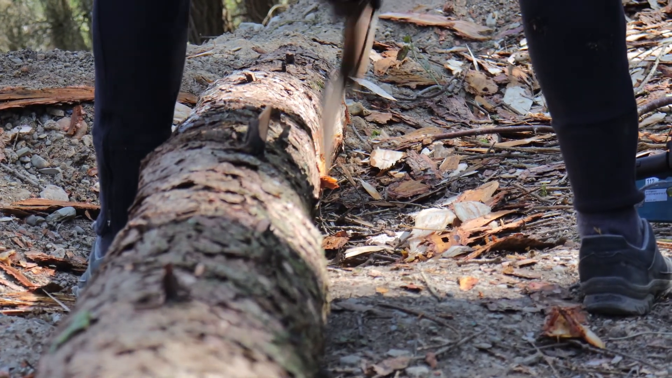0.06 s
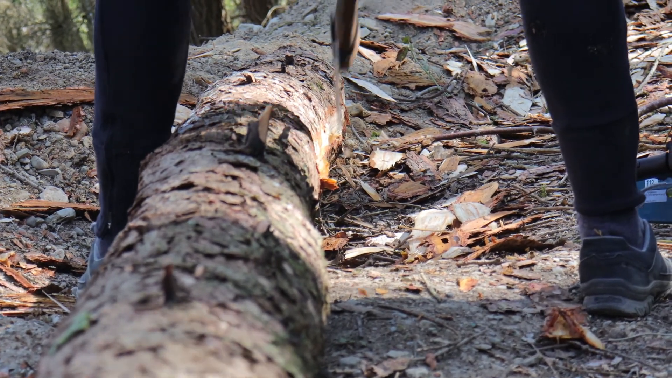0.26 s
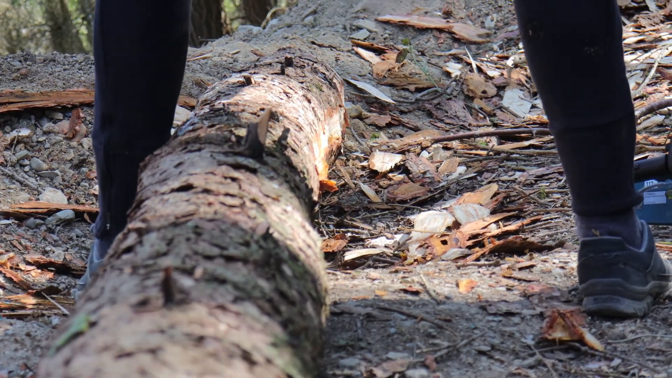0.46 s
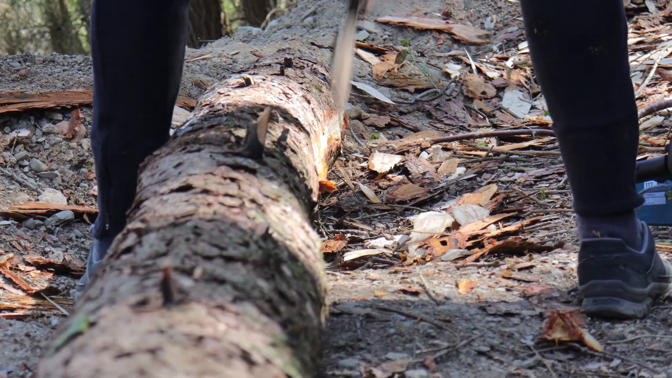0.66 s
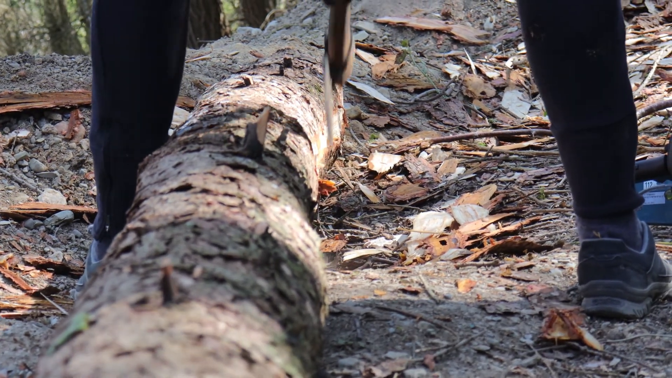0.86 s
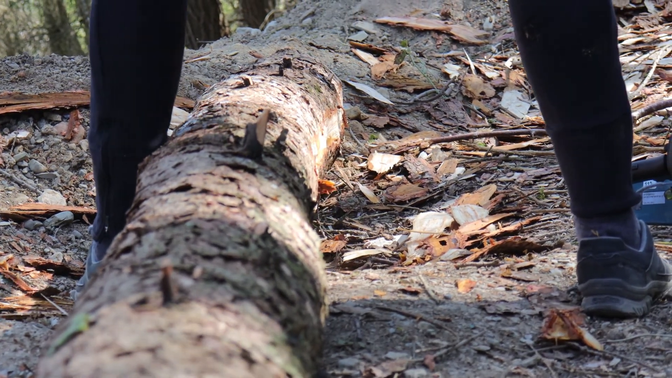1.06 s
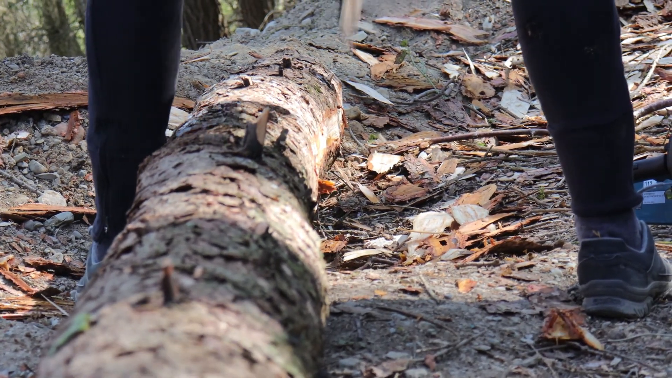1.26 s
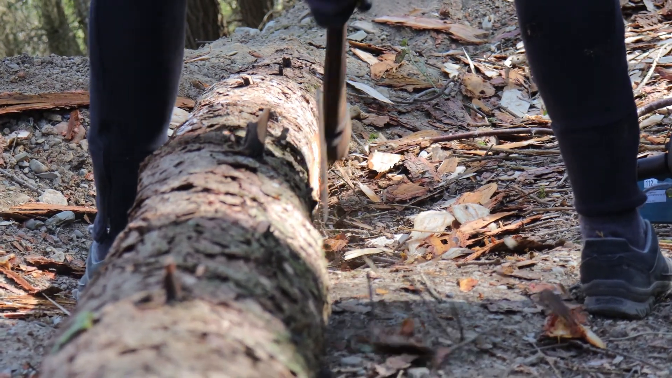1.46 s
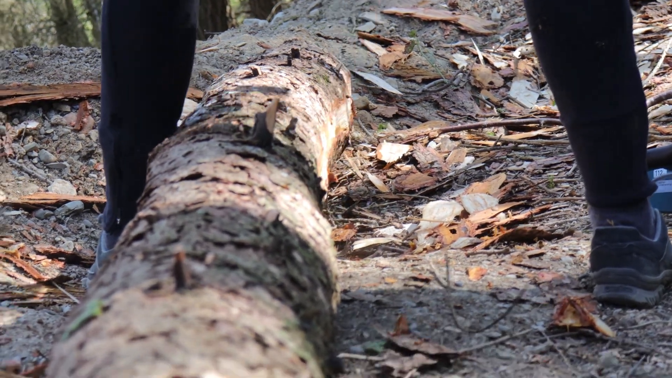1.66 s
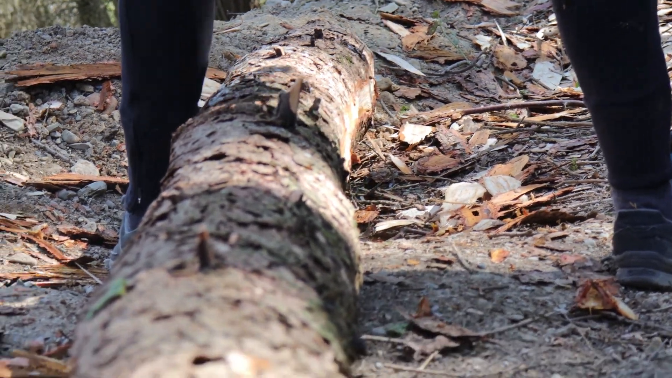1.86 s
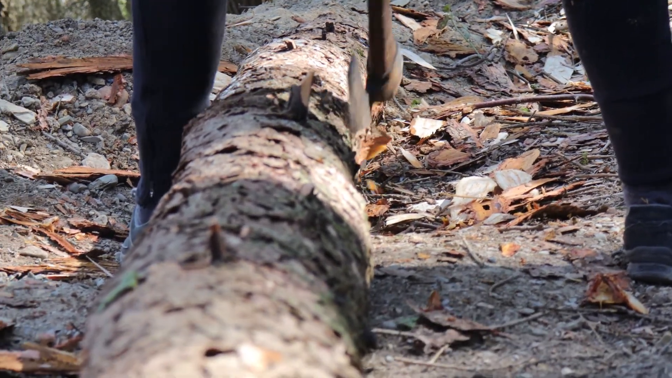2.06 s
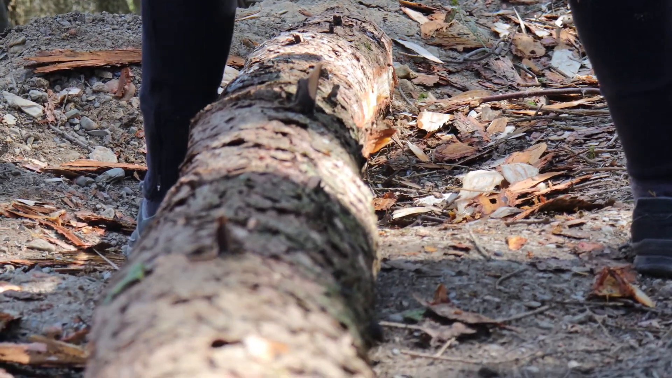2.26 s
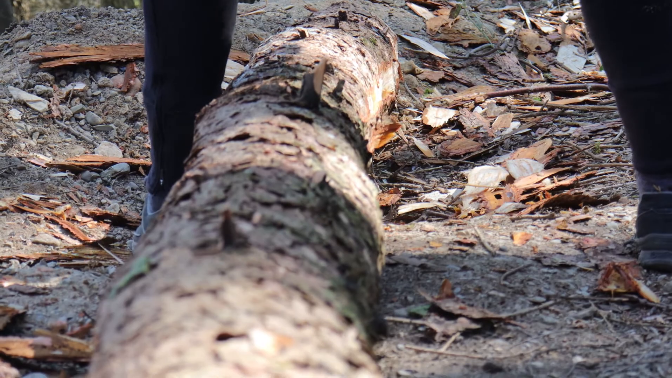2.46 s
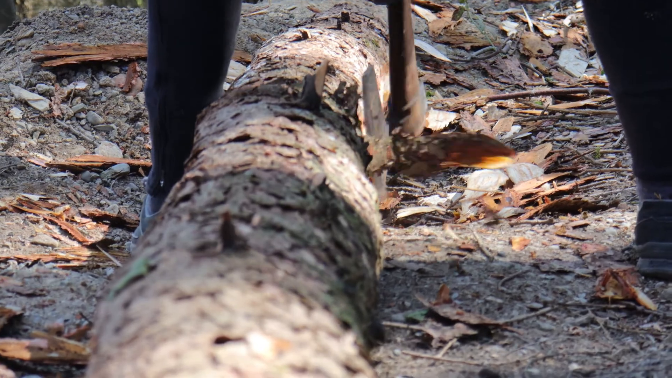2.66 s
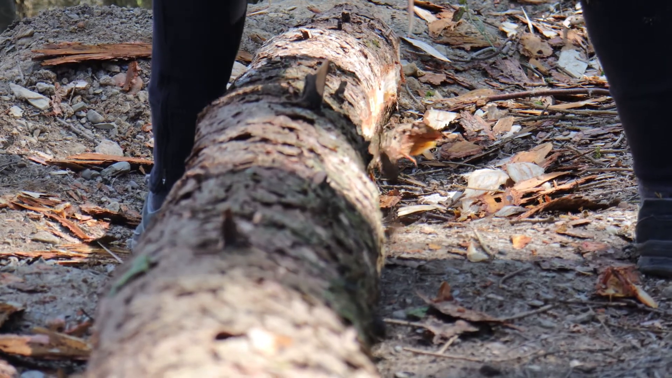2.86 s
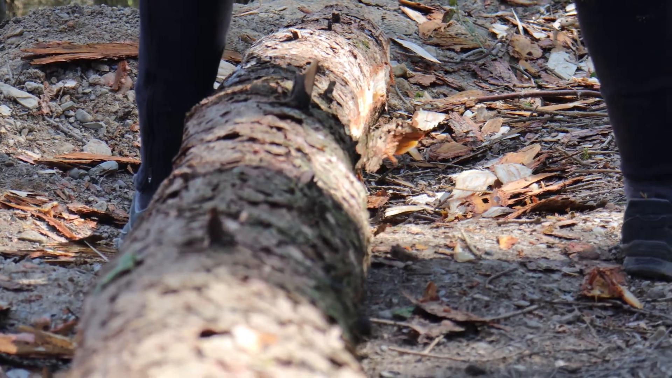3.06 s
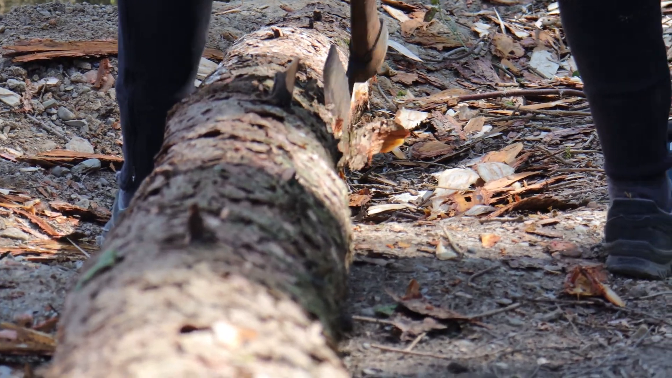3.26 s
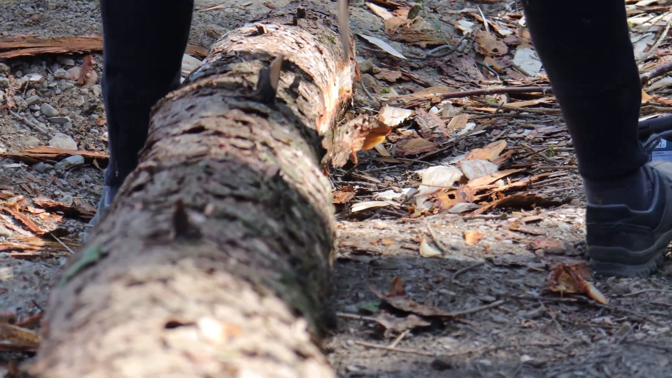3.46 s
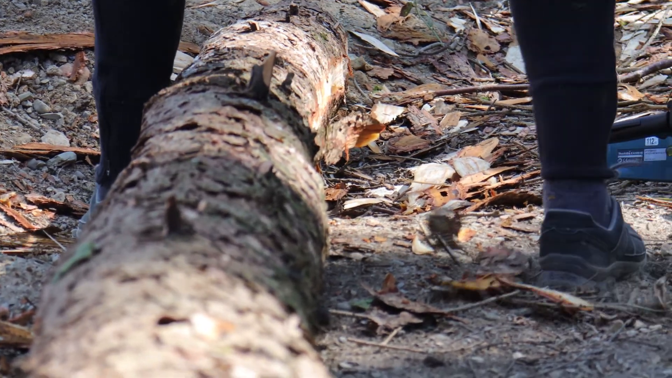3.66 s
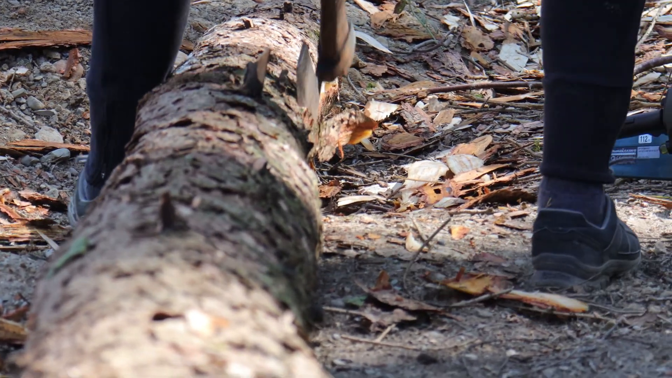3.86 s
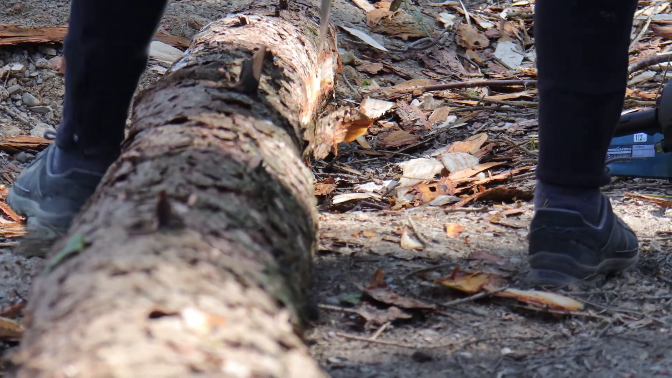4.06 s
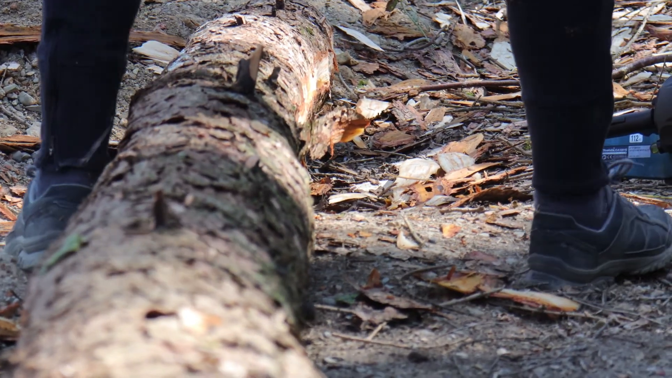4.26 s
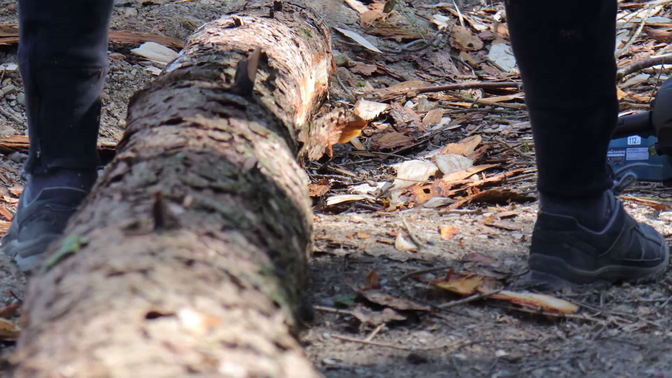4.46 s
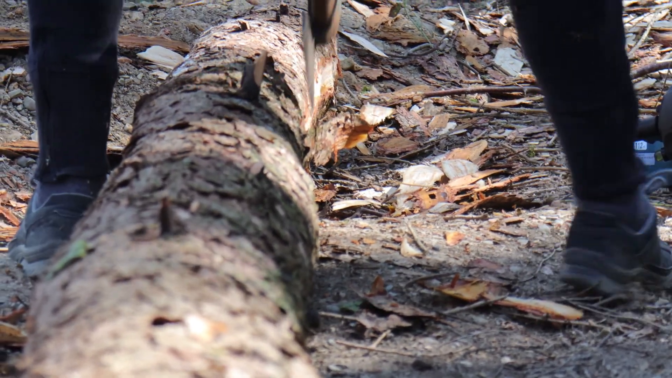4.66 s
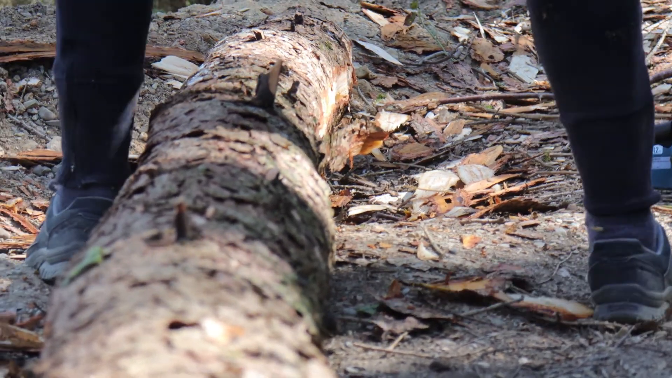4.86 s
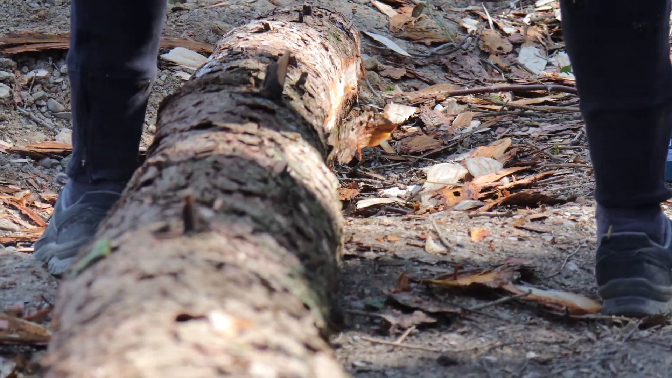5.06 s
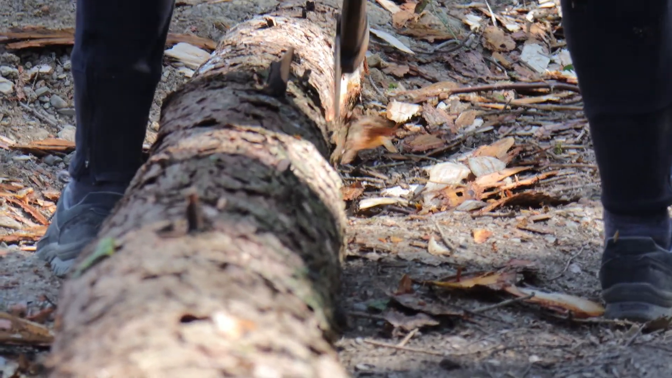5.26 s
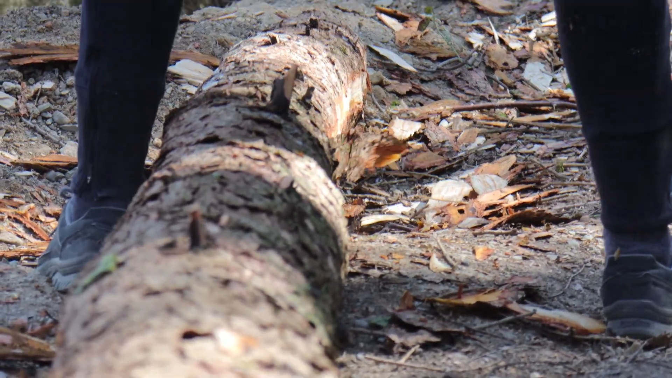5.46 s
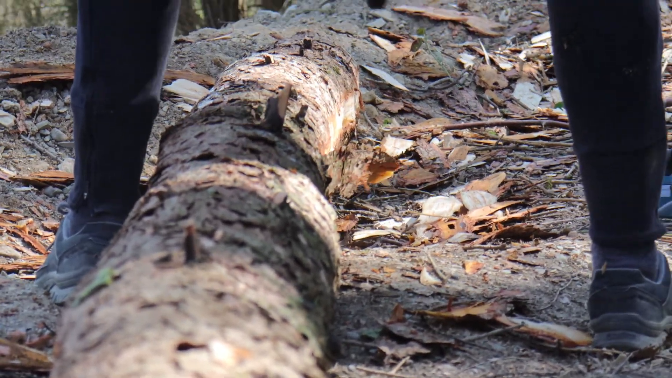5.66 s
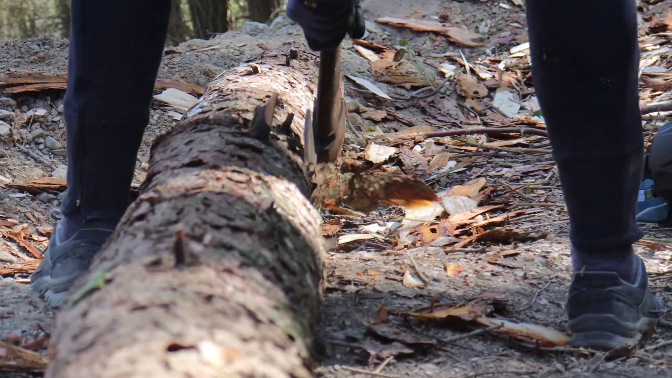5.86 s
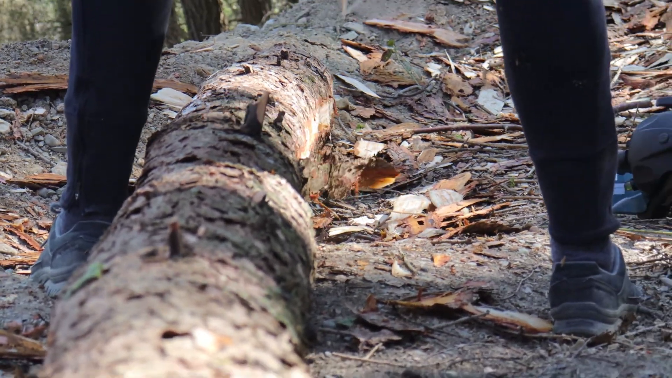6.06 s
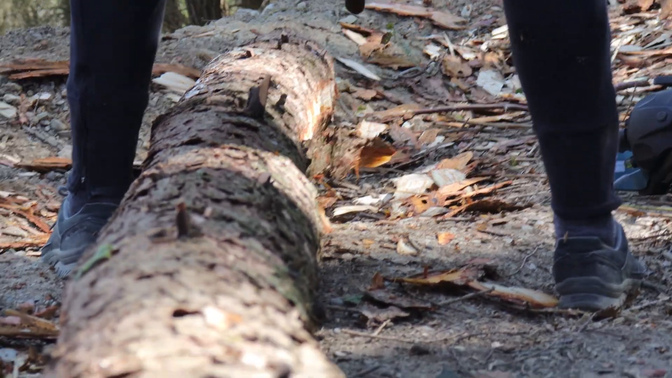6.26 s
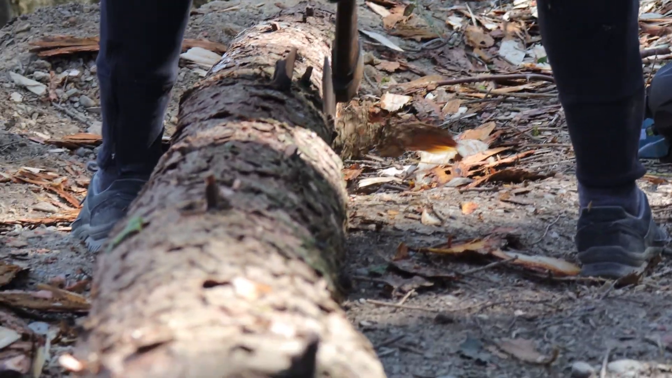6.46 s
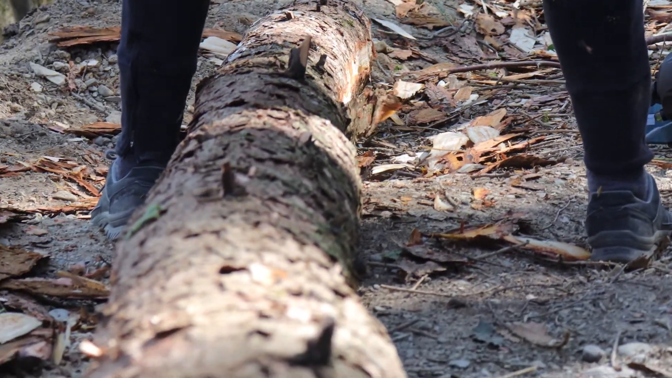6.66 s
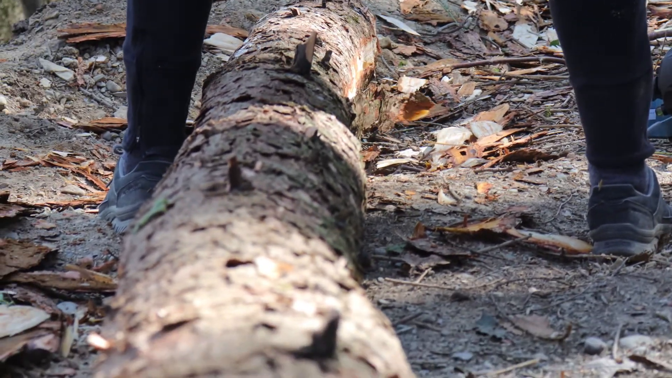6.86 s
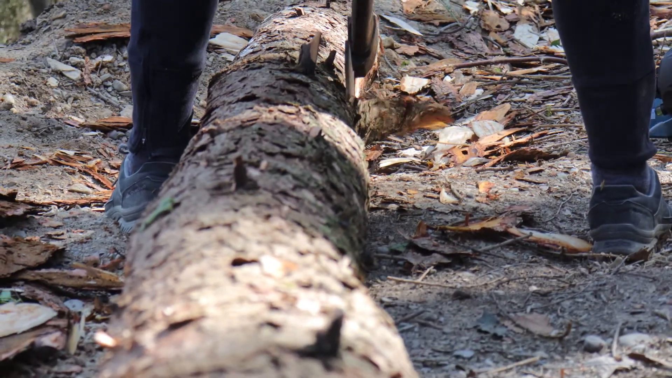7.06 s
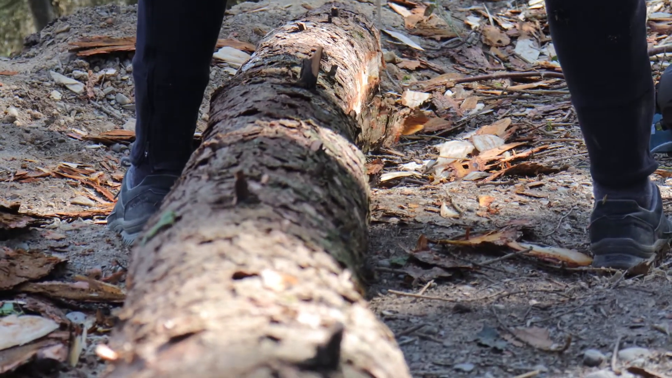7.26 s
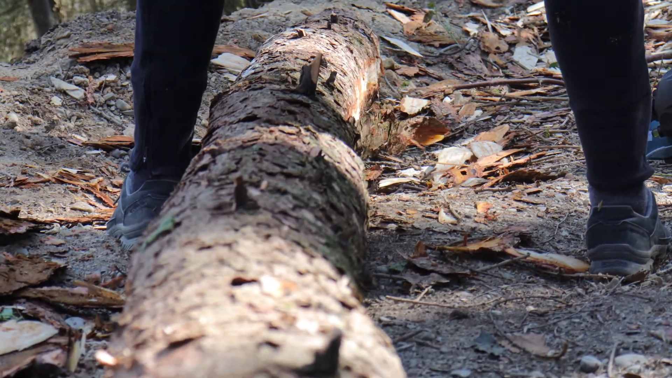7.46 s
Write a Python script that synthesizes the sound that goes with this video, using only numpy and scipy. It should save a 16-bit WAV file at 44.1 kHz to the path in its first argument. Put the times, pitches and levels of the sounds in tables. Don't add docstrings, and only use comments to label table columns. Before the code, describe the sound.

Close, hard axe strokes land in a log about every 0.6 seconds, each a crunchy crack with a short hollow ring of handle and wood and a faint echo off the trees. Chips snap and dry litter rustles between blows; boots and twigs crunch more in the second half. Low hum and leaf hiss lie beneath, with wind thumping a small stereo microphone a couple of metres away.

```python
import sys
import numpy as np
from scipy import signal
from scipy.fft import rfft, irfft
from scipy.io import wavfile
from scipy.ndimage import uniform_filter1d

SR = 44100
rng = np.random.default_rng(int(sys.argv[2]) if len(sys.argv) > 2 else 0)


def int16_out(signal):
    q = np.round(np.clip(np.atleast_2d(signal).T, -1, 1) * 32767)
    wavfile.write(sys.argv[1], SR, q.astype(np.int16))


def convert_level_to_amplitude(level_db):
    exponent = np.asarray(level_db, float) / 20
    return 10 ** exponent


N = 330750
T = np.arange(N) / SR


def on_log(table, count):
    hz, value = np.transpose(table)
    bin_hz = np.arange(count // 2 + 1) * SR / count
    return np.interp(np.log(bin_hz + 1), np.log(hz), value)


def unit(x):
    return x / np.sqrt(np.mean(x ** 2))


def coloured(table):
    white = rng.standard_normal(N)
    return unit(irfft(rfft(white) * convert_level_to_amplitude(on_log(table, N)), N))


def band(x, lo_hz, hi_hz):
    sos = signal.butter(2, [lo_hz, min(hi_hz, 0.45 * SR)], "bandpass", fs=SR, output="sos")
    return signal.sosfilt(sos, x)


def band_noise(shape, centre_hz, width_hz):
    white = rng.standard_normal(shape)
    return unit(band(white, centre_hz - width_hz / 2, centre_hz + width_hz / 2))


def grain(rate_hz, spread_db):
    hold = int(SR / rate_hz)
    steps = np.repeat(rng.standard_normal(N // hold + 1), hold)
    return unit(convert_level_to_amplitude(spread_db * uniform_filter1d(steps, hold)[:N]))


def add(out, start_s, x):
    i = int(start_s * SR)
    out[..., i:i + x.shape[-1]] += x[..., :N - i]


def swell(t, rise_s, t60_s):
    rise = t / max(rise_s, 1e-4)
    fade = -t * np.log(1000) / max(t60_s, 2e-3)
    return np.exp(np.where(t < 0, rise, fade))


def woods():
    # freq_hz, density_db per Hz
    hum_colour = [(18, -38), (30, -6), (58, 0), (76, 0), (112, 4.5), (135, 0), (248, -5.5), (359, -2.5),
                  (492, -10.5), (592, -10.5), (751, -7.5), (2050, -17.5), (6370, -28.5), (14400, -39.5),
                  (16500, -46)]
    # centre_hz, width_hz, level_db
    insect_bands = [(14700, 300, -68), (12400, 900, -69), (13600, 500, -75)]
    # start_s, end_s, pitch_hz, width_hz, level_db
    far_notes = [
        (0.892, 1.22, 2790, 35, -58),
        (1.127, 1.39, 2210, 52, -60),
        (1.92, 2.03, 2800, 50, -63),
        (2.515, 2.62, 3090, 11, -65),
        (2.515, 2.63, 4040, 8, -60),
        (2.51, 2.615, 4590, 9.2, -61.5),
    ]
    shared = coloured(hum_colour)
    hum = np.array([shared + 1.22 * coloured(hum_colour) for _ in range(2)])
    out = convert_level_to_amplitude(-50) * hum * grain(1.71, spread_db=0.53)
    for centre_hz, width_hz, level_db in insect_bands:
        out += convert_level_to_amplitude(level_db) * band_noise((2, N), centre_hz, width_hz)
    for start_s, end_s, pitch_hz, width_hz, level_db in far_notes:
        shape = np.interp(T, [start_s, start_s + 0.014, end_s - 0.04, end_s], [0, 0.98, 0.66, 0])
        out += convert_level_to_amplitude(level_db) * band_noise(N, pitch_hz, width_hz) * shape
    return out


def puffs(table):
    out, t = np.zeros(N), np.arange(-0.02, 0.02, 1 / SR)
    for peak_s, peak_db, centre_hz in table:
        sign, skew, lag, edge = rng.standard_normal(4)
        u = t * np.pi * np.clip(centre_hz, 90, 300)
        swing = (1 - 2 * u ** 2 + skew * u) * np.exp(-u ** 2)
        sharp = (1 - 2 * (2.65 * u) ** 2 + edge * u) * np.exp(-(2.29 * u) ** 2)
        sharp *= convert_level_to_amplitude(0.48 * peak_db - 6.5)
        start_s = peak_s - 0.02
        add(out, start_s, np.sign(sign) * convert_level_to_amplitude(peak_db + 4.5) * (swing + sharp))
        add(out, start_s + 0.01096 * np.sign(lag), convert_level_to_amplitude(peak_db + 2.5) * swing[::-1])
    return out


def wind():
    # peak_s, peak_db, centre_hz
    left_puffs = [(1.051, -22.5, 159), (2.593, -42, 190), (2.611, -27, 170), (2.627, -29, 150),
                  (2.71, -25, 330), (3.118, -34, 278), (3.147, -29.5, 190), (4.145, -41, 210),
                  (4.216, -22, 240), (4.234, -22.5, 190), (4.271, -22, 212), (4.316, -21.5, 200),
                  (4.863, -25, 650), (4.915, -31, 320), (4.929, -30, 160), (4.945, -29, 139),
                  (5.007, -38, 150), (5.173, -23.5, 127), (5.245, -30, 280), (5.268, -34, 260),
                  (5.321, -38, 180), (5.35, -37, 110), (5.414, -44, 110), (5.777, -25, 157),
                  (6.22, -42, 190), (6.246, -38, 200), (6.545, -40, 290), (6.564, -35, 300),
                  (7.478, -31.5, 158)]
    # peak_s, peak_db, centre_hz
    right_puffs = [(0.542, -29, 210), (0.646, -29.5, 220), (0.664, -26, 210), (0.678, -36, 220),
                   (0.699, -20.5, 220), (0.73, -27.5, 190), (0.892, -24.5, 140), (0.918, -43, 180),
                   (0.937, -27.5, 170), (0.952, -35, 150), (0.971, -28, 170), (0.991, -35, 190),
                   (1.007, -21, 160), (1.026, -21, 160), (1.083, -16.5, 160), (1.123, -11.5, 160),
                   (1.147, -9.5, 180), (1.164, -7, 210), (1.198, -11, 210), (1.214, -15, 220),
                   (1.238, -12.5, 200), (1.256, -15, 230), (1.279, -22, 320), (1.305, -30, 240),
                   (1.959, -22, 270), (2.163, -40, 160), (2.3, -37, 150), (2.445, -31.5, 150),
                   (2.521, -37, 130), (2.559, -29, 110), (2.723, -21, 260), (2.757, -18, 240),
                   (2.833, -20, 140), (2.849, -28, 120), (2.88, -19, 140), (2.903, -20, 140),
                   (2.932, -15, 160), (2.947, -15, 180), (2.969, -7, 170), (3.016, -22.5, 210),
                   (3.032, -26, 260), (3.06, -22, 220), (3.077, -21, 310), (3.099, -23, 290),
                   (3.273, -28.5, 220), (3.627, -37, 190), (3.674, -34, 340), (3.69, -20, 210),
                   (3.703, -15, 280), (3.716, -1, 220), (3.766, -34, 160), (3.791, -20.5, 320),
                   (3.81, -21, 330), (3.848, -33, 260), (3.883, -33, 250), (4.158, -39, 200),
                   (4.186, -32, 230), (4.34, -29, 210), (4.352, -25.5, 150), (4.383, -28, 190),
                   (4.434, -34, 170), (4.674, -30, 230), (4.766, -34, 300), (4.779, -31, 710),
                   (4.979, -22.5, 160), (5.022, -30, 610), (5.034, -36, 420), (5.072, -48, 290),
                   (5.085, -31, 120), (5.11, -34.5, 110), (5.127, -35, 150), (5.303, -40, 200),
                   (5.384, -24, 140), (5.44, -26, 160), (5.454, -29, 140), (5.48, -24, 180),
                   (5.55, -34, 140), (5.713, -25.5, 120), (5.758, -36, 210), (5.922, -32, 250),
                   (6.131, -34.5, 270), (6.259, -37, 110), (6.401, -36.5, 130), (6.584, -28, 180),
                   (6.622, -34, 140), (6.641, -39, 160), (6.686, -41, 120), (6.764, -38, 180),
                   (6.776, -31, 180), (6.787, -32.5, 190), (6.804, -33, 160), (6.987, -32, 160),
                   (7.028, -27.5, 140), (7.405, -27, 160), (7.421, -34, 100), (7.459, -24.5, 160),
                   (7.489, -32, 200)]
    left, right = puffs(left_puffs), puffs(right_puffs)
    rumble = [unit(band(rng.standard_normal(N), 70, 187)) * grain(28, spread_db=8.0) for _ in range(2)]
    late_right = np.roll(right, int(0.0019 * SR))
    return np.array([left + convert_level_to_amplitude(-13) * late_right + convert_level_to_amplitude(-67) * rumble[0],
                     right + convert_level_to_amplitude(-12) * left + convert_level_to_amplitude(-55) * rumble[1]])


def litter():
    # time_s, level_db, treble_db above it
    rustles = [
        [(0.2, -40.5, -11), (0.344, -53, -16), (0.5, -69, -6)],
        [(0.82, -34.5, -13), (0.844, -45.5, -12.5), (1.0, -53, -11)],
        [(1.42, -23, -3), (1.496, -41, -3.5), (1.75, -58, -16)],
        [(2.09, -44, 1), (2.188, -51, -16), (2.3, -67, 1)],
        [(2.7, -43, 3), (2.762, -53, -7), (2.85, -47, -8)],
        [(3.33, -37, -8), (3.35, -50, -10), (3.9, -54, -6)],
        [(3.97, -34, -10.5), (4.138, -47.5, -16), (4.45, -48.5, -8.5)],
        [(4.62, -49.5, -11), (4.87, -36, -12), (5.0, -57.5, -5)],
        [(5.22, -30.5, 2), (5.238, -40, -7.5), (5.4, -57.5, -20)],
        [(5.56, -54, -11), (5.656, -60, -10), (5.7, -56.5, -2)],
        [(5.87, -40.5, -6.5), (6.088, -55.5, -28), (6.1, -65, -15)],
        [(6.52, -41.5, -1.5), (6.666, -56.5, -19), (6.7, -70, -8)],
        [(7.14, -39, -4), (7.394, -58, -21), (7.4, -68, 10)],
    ]
    out = np.zeros((2, N))
    shared = rng.standard_normal(N)
    for port in out:
        grit = (shared + 0.5 * rng.standard_normal(N)) * grain(500, spread_db=7.0)
        body, treble = unit(band(grit, 600, 4250)), unit(band(grit, 3140, 14900))
        for rows in rustles:
            time_s, level_db, treble_db = np.transpose(rows)
            first_s, last_s = time_s[0], time_s[-1]
            fade = np.interp(T, [first_s - 0.015, first_s, last_s, last_s + 0.043], [0, 1, 1, 0])
            bright = convert_level_to_amplitude(np.interp(T, time_s, treble_db)) * treble
            port += fade * convert_level_to_amplitude(np.interp(T, time_s, level_db)) * (body + bright)
    return out


def ticks():
    # start_s, peak_db, centre_hz, left_minus_right_db
    snaps = [(1.489, -26, 2220, 2), (1.507, -32.5, 1240, -3), (1.517, -26.5, 2900, 1),
             (1.593, -33, 942, -1.5), (1.605, -36.5, 2200, 4), (1.66, -43, 2200, 0.5),
             (1.689, -33, 3270, -5), (2.25, -39, 2440, -0.5), (2.395, -47, 1010, -1.0),
             (2.479, -44, 834, 4), (2.848, -44.5, 1910, -0.5), (2.88, -43, 816, 3), (2.976, -42, 821, -5.0),
             (3.023, -37, 902, -9), (3.676, -18.5, 816, 3.5), (3.849, -46, 2700, 0.0),
             (4.038, -32, 1880, -0.5), (4.078, -21.5, 1160, 1), (4.244, -31, 980, 5),
             (4.394, -31.5, 1360, 0.0), (4.541, -36, 872, 2), (4.729, -31, 810, -15), (4.745, -25, 950, -9),
             (4.777, -25, 816, -9.0), (4.827, -26, 860, 0.0), (4.879, -28, 926, 5), (4.909, -22, 860, 6),
             (5.022, -23.5, 810, -12), (5.067, -23, 915, -3.5), (5.104, -39, 1130, -0.5),
             (5.122, -31.5, 1680, -4), (5.266, -37, 1760, 3), (5.804, -23.5, 848, 4.5),
             (5.986, -36, 848, -14), (6.132, -43, 867, -10), (6.23, -22, 2000, 9.5), (6.356, -44, 840, 13),
             (6.544, -37, 1490, -3), (6.795, -36, 950, 0.0), (6.982, -40, 1040, 8), (7.303, -41, 2010, -10),
             (7.417, -40, 890, -2)]
    out, t = np.zeros((2, N)), np.arange(0, 0.03, 1 / SR)
    for start_s, peak_db, centre_hz, pan_db in snaps:
        noise = rng.standard_normal(len(t))
        snap = unit(band(noise, 0.44 * centre_hz, 1.53 * centre_hz))
        snap += 0.25 * unit(band(noise, 2100, 11200))
        port_db = np.array([[pan_db], [-pan_db]]) / 2
        add(out, start_s, convert_level_to_amplitude(peak_db - 2.5 + port_db) * snap * swell(t - 0.0008, 0.00025, 0.021))
    return out


def rings():
    # start_s, handle_db, log_db, knock_db, upper_handle_db, steel_db
    blows = [(.169, -11.5, -19, -24.5, -41, -40), (0.779, -26, -15, -27.5, -35, -35),
             (1.397, -22, -21, -36, -26.5, -19.5), (2.067, -26.5, -35, -34, -32.5, -37),
             (2.670, -12.5, -16, -23.5, -31, -32.5), (3.301, -19, -22.5, -26, -34.5, -44),
             (3.939, -21.5, -24.5, -32, -32.5, -39), (4.586, -11.5, -20, -34, -34, -37),
             (5.192, -19.5, -34.5, -24.5, -27, -31.5), (5.836, -14, -31, -26, -21.5, -44),
             (6.486, -12.5, -21, -20, -32, -37), (7.107, -16.5, -26.5, -20.5, -31, -44)]
    # pitch_hz, level_db, t60_s
    handle = [(303, 2.5, 0.28), (297, -14.5, 0.24), (198, -12, 0.19)]
    log = [(431.5, 0, 0.19), (457, -2, 0.17), (397.5, 3, 0.11)]
    knock = [(562.5, 6.5, 0.099), (692, 6, 0.077), (1271, 8, 0.047), (240, 6, 0.073)]
    upper_handle = [(828, 8, 0.1), (930, -10.5, 0.055)]
    steel = [(2440, -5.5, 0.31), (2510, 7, 0.11), (3230, -4, 0.19), (4450, -9.5, .25), (5550, -4, .2),
             (1915, 4, 0.088)]
    parts = (handle, log, knock, upper_handle, steel)
    out, t = np.zeros(N), np.arange(0, 0.5, 1 / SR)
    for start_s, *part_levels_db in blows:
        for part_db, modes in zip(part_levels_db, parts):
            for pitch_hz, mode_db, t60_s in modes:
                tune, weight, phase = rng.standard_normal(3)
                push = 1 - np.exp(-t * pitch_hz * 1.97)
                tone = np.sin(2 * np.pi * pitch_hz * (1 + 0.0046 * tune) * t + phase)
                level = convert_level_to_amplitude(part_db + mode_db + 0.7 * weight)
                add(out, start_s, level * push * tone * swell(t, 1, t60_s))
    return out


def cracks():
    # start_s, peak_db, thud_db and splinter_db above it, rise_s, t60_s
    splits = [(0.1635, -0.5, -6, -9, 0.0013, 0.028), (0.7768, -3, -13, -7.5, 0.0018, 0.037),
              (1.3942, -1, -8, -3.5, 0.0019, 0.044), (1.41, -9.5, -17, -16, 0.0029, 0.046),
              (2.0345, -3, -8, -4, 0.0023, 0.058), (2.0636, -2.5, -5.5, -5, 0.0027, 0.017),
              (2.6505, -8.5, -0.5, -8, 0.0013, 0.042), (2.6682, -9, -6.5, -1.5, 0.0029, 0.069),
              (3.2996, -0.5, -3.5, -5.5, 0.002, 0.019), (3.935, 2.5, -6.5, -6.5, 0.0013, 0.028),
              (4.5822, 2.5, -2.5, -6.5, 0.0012, 0.023), (5.1893, -1, -3, -5.5, 0.0019, 0.044),
              (5.201, -14.5, -16, -11, 0.0026, 0.052), (5.833, 0, 1, -7.5, 0.0018, 0.028),
              (6.4819, 1, -6, -6.5, 0.002, 0.033), (7.0944, 0, 0.5, -3, 0.0012, 0.028),
              (7.1059, -2.5, -18, -4, 0.0042, 0.028)]
    # freq_hz, density_db per Hz
    wood_colour = [(240, -28), (400, -2), (844, -1), (1050, 1), (1260, -2), (2150, -9), (2510, -3.5),
                   (2930, -13), (3700, -9), (4190, -13.5), (5460, -7), (7220, -5.5), (7920, -8.5),
                   (15200, -18.5), (16500, -39)]
    wood = coloured(wood_colour) * grain(900, spread_db=2.0)
    thud, snap, splinter = unit(band(wood, 470, 1526)), unit(band(wood, 1310, 4830)), unit(band(wood, 5500, 18700))
    out, t = np.zeros(N), np.arange(-0.03, 0.3, 1 / SR)
    for start_s, peak_db, thud_db, splinter_db, rise_s, t60_s in splits:
        first = int((start_s - 0.03) * SR)
        now = slice(first, first + len(t))
        burst = convert_level_to_amplitude(thud_db) * thud[now] * swell(t - 0.0015, 1.58 * rise_s, 1.2 * t60_s)
        burst += snap[now] * swell(t - 0.0021, rise_s, t60_s)
        burst += convert_level_to_amplitude(splinter_db) * splinter[now] * swell(t - 0.0019, 0.41 * rise_s, 0.97 * t60_s)
        out[now] += convert_level_to_amplitude(peak_db - 5) * burst
    return out


def trunks(x):
    t = np.arange(0, 0.6, 1 / SR)
    tail = band(rng.standard_normal((2, len(t))), 310, 6400) * swell(t - 0.028, 0.0064, 0.39)
    return signal.fftconvolve(x[None], tail, axes=1)[:, :N]


def ports(x):
    # freq_hz, left_minus_right_db
    port_db = [(60, -0.5), (110, -0.5), (200, 2), (380, -1.5), (700, 1), (1290, 1.5), (2380, -4),
               (4400, -0.5), (8120, 0.5), (15000, -9)]
    # freq_hz, left_lead_rad
    port_phase = [(0, 0), (2410, -0.23), (3010, 0.66), (4050, 0.82), (4650, -0.77), (7060, -0.68),
                  (7840, -0.78), (10200, -1.2), (10500, -1.2), (12400, 0.17), (14300, 2), (15300, 1.1),
                  (15800, 0.29), (16200, 0.1)]
    half = convert_level_to_amplitude(on_log(port_db, N) / 2) * np.exp(0.5j * on_log(port_phase, N))
    return irfft(rfft(x) * np.array([half, 1 / half]), N)


def scene():
    axe = cracks() + rings()
    return ports(axe) + convert_level_to_amplitude(-57.5) * trunks(axe) + ticks() + litter() + wind() + woods()


def roll_off(x):
    return signal.sosfilt(signal.butter(12, 16610, fs=SR, output="sos"), x)


def record(dry):
    bass_cut = signal.butter(2, 60, "highpass", fs=SR, output="sos")
    mix = np.clip(signal.sosfilt(bass_cut, dry), -1, 1)
    return roll_off(mix)


dry = scene()
out = record(dry)
int16_out(out)
```